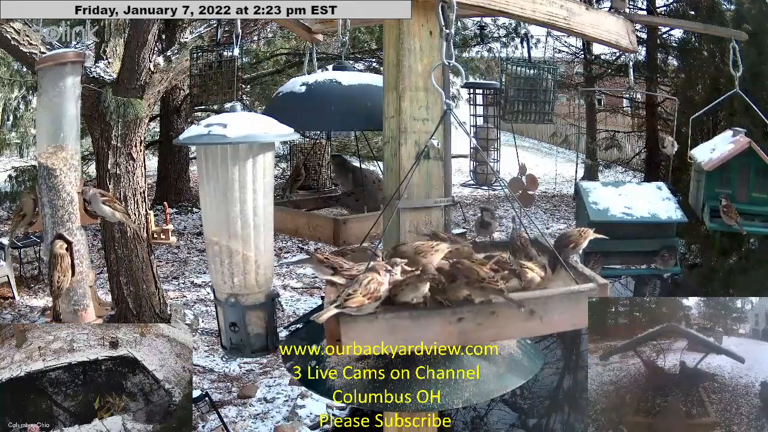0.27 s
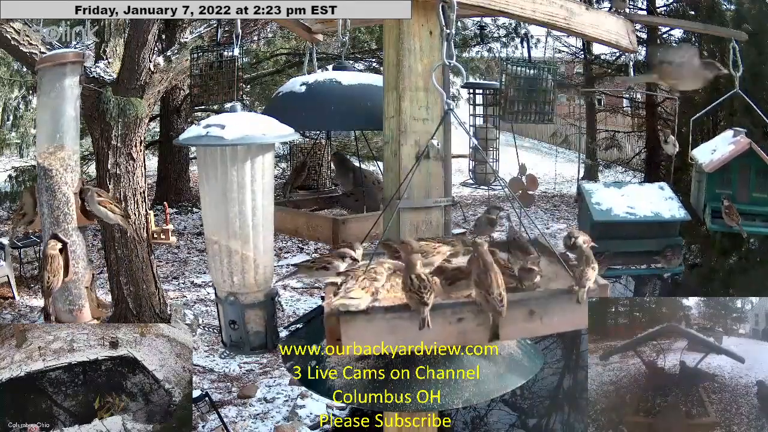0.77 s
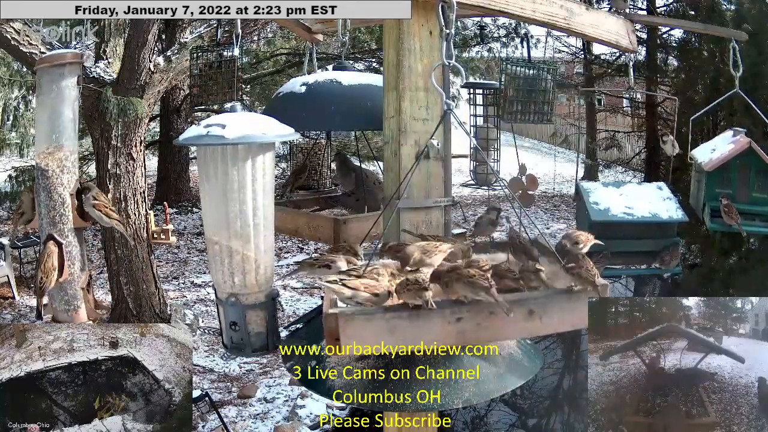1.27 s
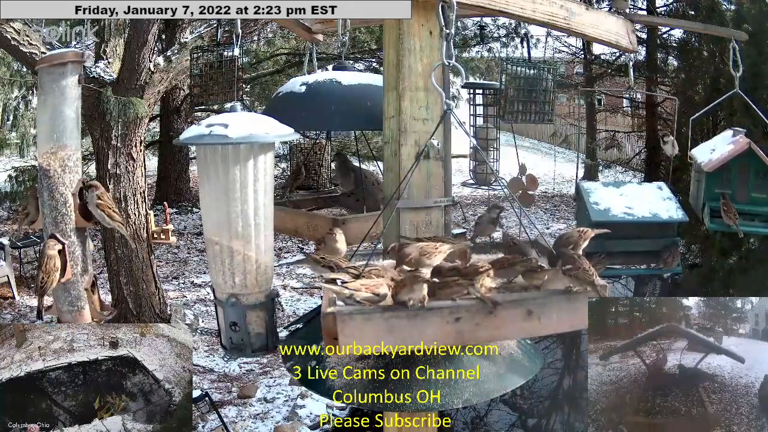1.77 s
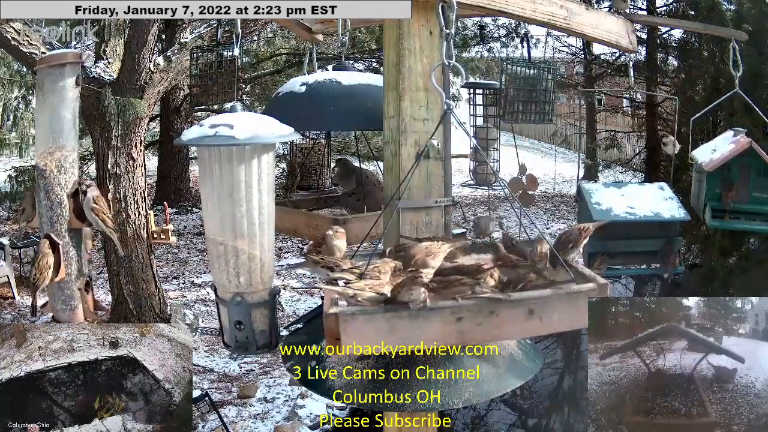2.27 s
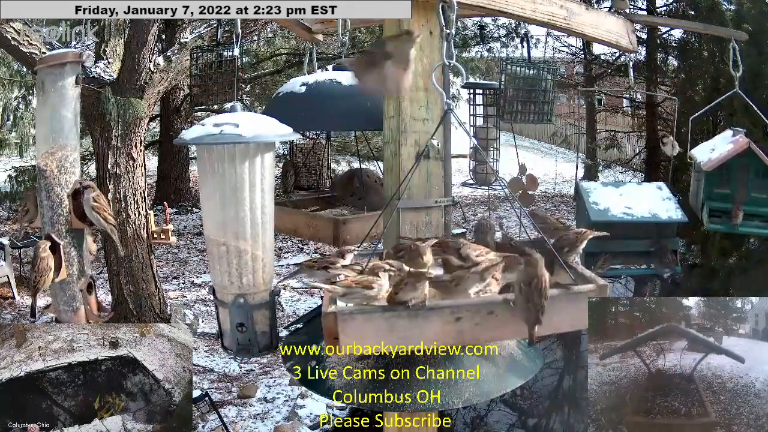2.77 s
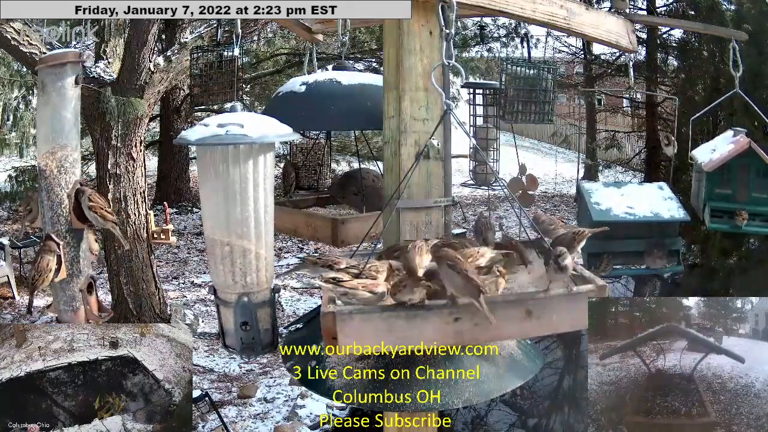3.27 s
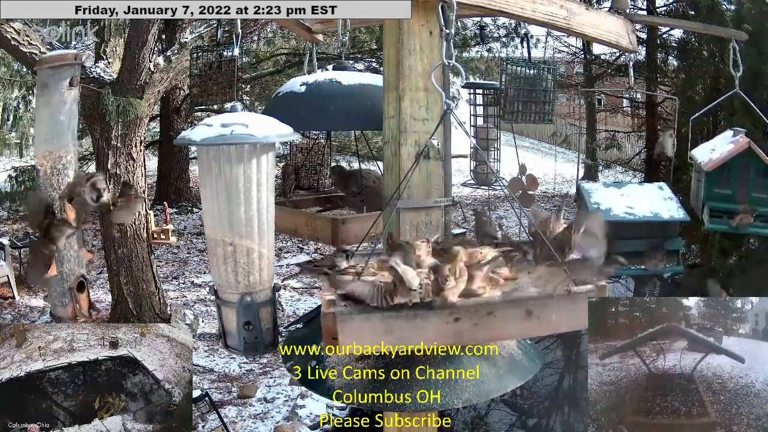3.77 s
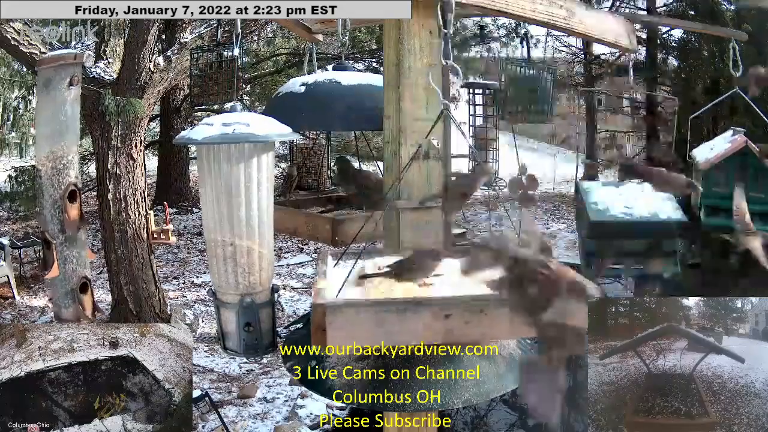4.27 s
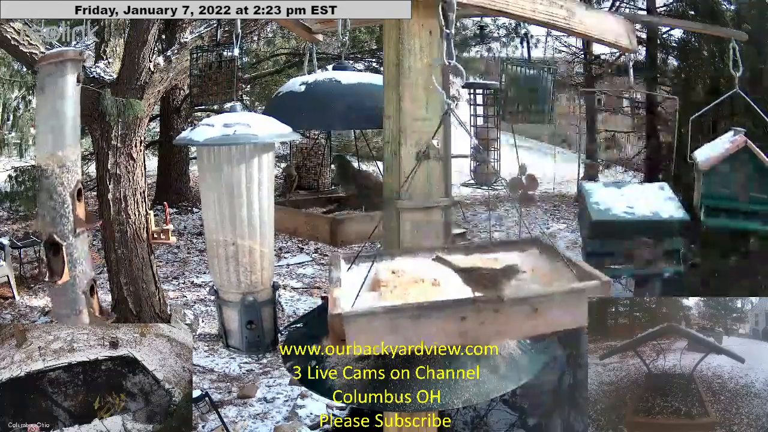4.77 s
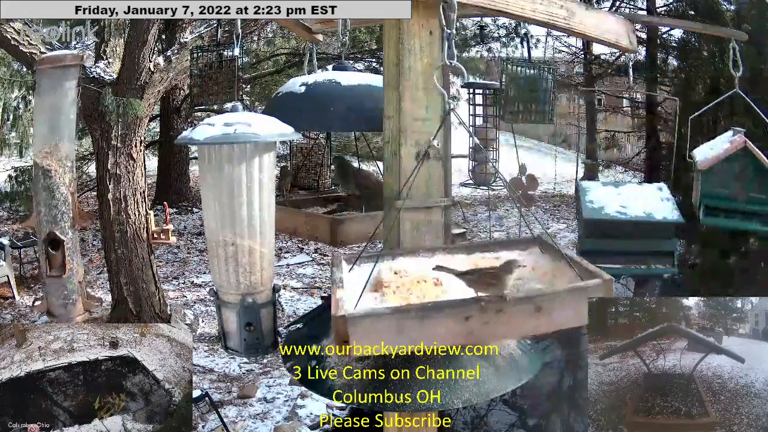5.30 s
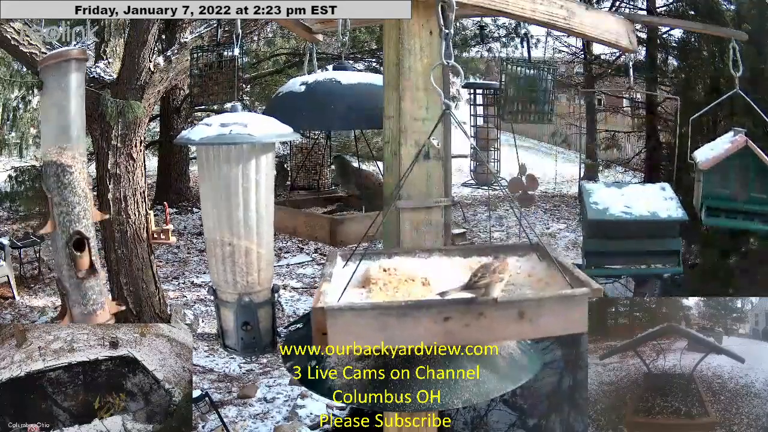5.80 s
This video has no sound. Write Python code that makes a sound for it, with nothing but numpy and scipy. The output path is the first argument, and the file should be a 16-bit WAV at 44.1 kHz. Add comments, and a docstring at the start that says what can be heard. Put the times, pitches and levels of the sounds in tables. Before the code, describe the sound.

Small birds peck and tick at seed on a wooden tray with sparse sharp chirps, then louder knocks and a throbbing rush of wings.

```python
"""Sparrows on a garden seed tray

A winter garden: chirps are gliding sines; seeds, beaks and claws ring decaying modes or scuff in noise grains.
Single birds flutter off, then the flock leaves in two waves of throbbing noise. Puffs, downwash and light
air buffet the microphone with low wavering lumps. A machine hums nearby, over the far murmur of the
neighbourhood in shaped noise; nearby surfaces give the calls, taps and scuffs a short tail."""
import sys
import numpy as np
from scipy import signal
from scipy.fft import rfft, irfft, next_fast_len
from scipy.io import wavfile
from scipy.ndimage import uniform_filter1d

SR = 44100
rng = np.random.default_rng(int(sys.argv[2]) if len(sys.argv) > 2 else 0)


def materialize(psi):
    """Save the field psi as 16-bit PCM at rate SR to the path in sys.argv[1].

    A 1-D psi becomes a single channel; in a 2-D psi each row is a channel.
    """
    bounded = np.clip(np.atleast_2d(psi).T, -1, 1)
    quanta = np.round(bounded * 32767).astype(np.int16)
    wavfile.write(sys.argv[1], SR, quanta)


N = 266364   # samples, about 6 s

# Clear chirps, one table for each side of the syrinx: [t/s, f/Hz, peak level/dB]
CHIRPS = [
    [(0.838, 5660, -49), (0.86, 5360, -44), (0.88, 4990, -43), (0.895, 4420, -49), (0.902, 3560, -49)],
    [(0.984, 6750, -54), (1.0, 6020, -47.5), (1.02, 5710, -37.5), (1.04, 5000, -49), (1.057, 4030, -51)],
    [(0.978, 6100, -56), (0.995, 5610, -42.5), (1.015, 5390, -49), (1.03, 4840, -52), (1.045, 4130, -56)],
    [(4.04, 7300, -49), (4.05, 6500, -48), (4.062, 6420, -44), (4.075, 5970, -37.5), (4.09, 5610, -39),
     (4.094, 5560, -56)],
    [(4.098, 5310, -52), (4.104, 5120, -38), (4.112, 4900, -36), (4.128, 4940, -37.5), (4.137, 4700, -60)],
    [(4.034, 6160, -41.5), (4.06, 5600, -45), (4.085, 5110, -41), (4.105, 4540, -44.5), (4.125, 4170, -39),
     (4.14, 3850, -60)],
    [(5.064, 5790, -57), (5.075, 5650, -29.5), (5.085, 5270, -32), (5.093, 5370, -34), (5.105, 5040, -29.5),
     (5.115, 4750, -29), (5.124, 4220, -31)],
    [(5.055, 4460, -49), (5.066, 4810, -33.5), (5.078, 4680, -26), (5.088, 4220, -33), (5.1, 4180, -29.5),
     (5.113, 4060, -32), (5.126, 3400, -40)],
    [(5.24, 6220, -47), (5.26, 5990, -43), (5.29, 5530, -52), (5.32, 4920, -49)],
    [(5.525, 7160, -54), (5.535, 6480, -37), (5.545, 6620, -36), (5.555, 6120, -40), (5.563, 5910, -51)],
    [(5.52, 6150, -46), (5.54, 5940, -37), (5.55, 5700, -36.5), (5.56, 5390, -38)],
]
# Low calls with overtones: [t/s, f/Hz, level/dB of fundamental, of 2nd harmonic, of 3rd where it sounds]
LOW_CALLS = [
    [(.836, 2600, -60, -57, -70), (.855, 2563, -57.5, -44.5, -53), (.87, 2400, -65, -48, -48),
     (.885, 2100, -66, -53, -51), (.893, 2060, -72.5, -64, -63)],
    [(1.538, 6250, -64, -85), (1.55, 5130, -47.5, -90), (1.562, 4190, -50.5, -95), (1.572, 2876, -50, -66),
     (1.587, 2606, -55, -62), (1.6, 2560, -63.5, -62), (1.625, 2640, -44, -52), (1.65, 2370, -44, -53.5),
     (1.669, 1885, -64, -60)],
    [(5.172, 2209, -43.5, -56), (5.18, 2527, -44, -44), (5.19, 2976, -42, -42), (5.2, 3171, -39.5, -54),
     (5.22, 3050, -40.5, -64), (5.242, 2860, -45, -57)],
]
# Faint short notes and overtones, each one straight glide:
# [start t/s, length t/s, first f/Hz, last f/Hz, peak level/dB]
SHORT_NOTES = [(.915, .017, 2050, 1880, -60), (0.979, 0.016, 1670, 1620, -73),
               (0.838, .033, 8150, 8750, -64), (1.46, 0.018, 4500, 3920, -51.5),
               (3.183, 0.089, 1708, 1750, -68), (3.413, 0.01, 6950, 6690, -53),
               (3.417, 0.024, 5860, 5240, -56), (3.418, 0.056, 2620, 2780, -65),
               (3.85, 0.038, 3370, 3346, -62), (3.848, .05, 2440, 2380, -72),
               (4.482, 0.027, 6250, 6300, -67), (4.736, 0.022, 4700, 4000, -49.5),
               (4.976, 0.025, 5640, 5314, -43), (5.878, 0.096, 5550, 4356, -61.5),
               (5.888, 0.036, 4943, 4740, -60)]
NOTE_EDGE_DB = -11.5   # start and end of a short note, relative to its middle

# Beaks, seeds and claws on the tray: [t/s, snap level/dB, low knock level/dB, bright tick level/dB]
TAPS = [(0.0616, -28, -20.5, -60), (0.2853, -52, -63, -53), (.3429, -42, -61.5, -60),
        (0.402, -30, -30, -90), (.4339, -54, -43, -90), (.4574, -48, -41, -64), (0.6168, -60, -57, -60),
        (0.716, -50, -51, -78), (0.9207, -52, -56, -73), (1.199, -39.5, -43, -82),
        (1.3527, -48.5, -41.5, -50), (1.436, -44, -47, -80), (1.6757, -44, -35, -49),
        (1.6912, -46, -28.5, -40), (1.7004, -57, -52, -37), (1.7837, -41, -30.5, -38),
        (1.8575, -44, -51, -40), (1.891, -57.5, -35, -45), (1.9357, -41, -36, -41),
        (2.2274, -43, -44, -79.5), (2.2449, -25, -26, -78), (2.2528, -52, -37, -80),
        (2.6495, -44, -37, -75), (2.8591, -53, -35.5, -64.5), (3.3892, -60, -34, -53),
        (3.4718, -46, -28, -55), (4.1737, -63, -60, -42), (4.21, -55, -55, -45), (4.4273, -54, -49, -61),
        (4.7268, -31.5, -29.5, -82), (4.8694, -55, -32, -68), (4.9324, -54.5, -31, -64),
        (5.035, -21.5, -12.5, -53.5), (5.2055, -24, -35, -26), (5.2348, -30, -18, -29),
        (5.265, -29, -16.5, -36), (5.296, -47, -24, -36), (5.3311, -36, -21.5, -43),
        (5.4591, -32.5, -17, -79), (5.4947, -27, -14.5, -80), (5.502, -50, -12.5, -57.5),
        (5.567, -49, -9.5, -23), (5.576, -16, -21, -17.5), (5.6471, -33, -21, -45), (5.7214, -48, -23, -52)]
# Resonances of tray and seed shells, low, middle and bright: [f/Hz, relative level/dB, share of the ring time]
KNOCK_MODES = [(1070, -8, 1.06), (1317, -5, 0.63), (1760, 0.5, 0.29)]
SNAP_MODES = [(2365, -0.5, 0.69), (2860, 1.5, 0.26), (3370, 2.5, 0.71), (4270, -3, 1.74)]
TICK_MODES = [(5670, -6, 0.98), (6600, -2.5, 1), (7370, -4.5, 0.74)]
RING_T60_S, MODE_PITCH_SPREAD = 0.0068, 0.046   # time for share 1; spread as a fraction of f
SCATTER_T60_S = 0.065
# Fainter pecking at random while the birds feed; mean levels are (snap, knock, tick)
PECKS_PER_S, PECK_DB, PECK_SPREAD_DB, FEEDING_ENDS_S = 4, (-59, -52, -66), 4, 4.8

# Claws and feathers scuffing tray and seed: [start t/s, length t/s, centre f/Hz, width f/Hz, level/dB]
SCUFFS = [(0.022, .09, 2800, 2420, -59), (0.066, .045, 3000, 3070, -61), (0.449, .077, 2280, 610, -64.5),
          (0.45, .054, 6020, 2520, -65), (0.389, 0.056, 1800, 2500, -67), (0.626, .023, 6800, 1170, -65),
          (1.143, .055, 2380, 600, -66), (1.431, .046, 2500, 2500, -61), (1.679, .043, 1500, 2000, -71),
          (1.769, .041, 1200, 1800, -62), (1.93, .052, 1480, 2200, -56.5), (1.967, .043, 3420, 5100, -66),
          (2.026, .032, 4000, 5000, -76), (2.081, 0.038, 5070, 3900, -62), (2.12, 0.046, 5000, 3500, -64),
          (2.171, 0.026, 5500, 3500, -63), (2.225, .083, 2980, 2510, -72), (2.267, .055, 3930, 1170, -66.5),
          (2.636, .066, 2860, 2480, -65), (2.775, .117, 2120, 1200, -63.5), (2.83, 0.053, 5400, 4000, -69),
          (2.834, .072, 1330, 500, -54.5), (2.914, .074, 1370, 300, -70), (2.94, .064, 5760, 2000, -71),
          (3.189, .15, 1900, 800, -70.5), (3.412, .037, 5850, 2200, -62), (3.414, .046, 2700, 500, -59.5),
          (3.466, .041, 4650, 4000, -58), (3.471, .078, 1020, 454, -56.5),
          (3.481, 0.064, 4000, 5000, -65.5), (3.82, .058, 2860, 2490, -64), (3.855, .049, 3450, 1200, -68),
          (3.9, .104, 4000, 3500, -68.5), (3.968, .054, 3800, 1200, -68), (4.721, .087, 3720, 2500, -59.5),
          (4.97, .035, 5620, 700, -47), (5.151, .05, 5800, 900, -46.5)]

# Fence, trunks and house wall: decay time and level of their tail
GARDEN_T60_S, GARDEN_DB = .13, -18.5

# Flock taking off in two waves: [t/s, feather rustle level/dB]; the low sweep follows it
FLOCK = [(4.7, -72.5), (4.85, -64), (5.0, -51.5), (5.12, -48.5), (5.26, -41), (5.4, -47.5), (5.47, -47),
         (5.55, -41.5), (5.62, -43.5), (5.75, -49.5), (5.9, -64), (6.04, -73)]
FLOCK_SWEEP_DB = 2   # low sweep relative to the rustle
# Single birds fly or flutter: [start t/s, length t/s, feather rustle level/dB, low wing sweep level/dB]
FLIGHTS = [(0.086, 0.015, -70, -78), (0.435, 0.07, -73, -65), (0.897, 0.06, -68, -77),
           (1.694, 0.31, -58.5, -60.5), (3.431, 0.024, -66.5, -76), (3.541, 0.025, -96, -67),
           (4.012, 0.11, -57.5, -65), (4.155, 0.12, -61, -62), (4.687, 0.071, -69, -66.5)]
FLIGHT_RISE_DB_PER_S, FLIGHT_FALL_DB_PER_S = 133, 103
# Feeding birds shift about all the time: rustle, low sweep, and the swing of both
SHUFFLE_DB, SHUFFLE_SWEEP_DB, SHUFFLE_SWING_DB = -76.5, -70, 3.5
# Colour of air through feathers: [f/Hz, relative level/dB per Hz]
RUSTLE = [(300, -25.5), (700, -8), (1600, -4), (3200, -5), (5600, -4), (7400, -9), (7900, -23),
          (8500, -27.5), (9100, -42.5)]
# Colour of the low sweep of the wings: [f/Hz, relative level/dB per Hz]
SWEEP = [(90, -17.5), (160, -1.5), (300, -6), (450, -9), (700, -13.5), (1200, -21)]
# Wingbeats of several birds, never quite in step: [central f/Hz]
WINGBEATS_HZ = [23.2, 24.5, 26.95]

# Downwash on the microphone, one bird landing close by, then the flock: [t/s, level/dB, f/Hz of the lumps]
DOWNWASH = [
    [(.1, -62, 34), (.18, -44.5, 35.4), (.3, -33, 45.65), (.37, -36, 60.03), (.43, -56.5, 35.7)],
    [(4.75, -53.5, 45.07), (5.0, -44, 42.2), (5.13, -33.5, 65.4), (5.2, -31, 68.3), (5.26, -20.5, 51.07),
     (5.37, -28, 40.67), (5.42, -34.5, 46.45), (5.47, -31, 48.2), (5.6, -33.5, 53.23), (5.72, -37, 50.16),
     (5.85, -40.5, 43.2), (6.04, -44.5, 40.4)],
]
# Lone puffs from a wing close by: [t/s, level/dB, f/Hz of the lumps]
PUFFS = [(.05, -41, 31.3), (0.137, -38, 36.8), (0.218, -38, 41.2), (0.488, -40, 47.74),
         (1.505, -32.5, 43.2), (1.68, -46, 41.9), (2.222, -42, 27.05), (2.732, -46.5, 52.6),
         (3.87, -50, 27), (4.1, -52, 69.2)]
PUFF_FADE_DB_PER_S = 450   # both rise and fall
# Light air stirring at the microphone: [t/s, mean level/dB, central f/Hz of the lumps]
BREEZE = [(0, -56, 35.7), (.45, -50, 25.3), (.65, -60, 39.9), (1.1, -56, 32.1), (1.33, -46.5, 23.24),
          (1.45, -51.5, 37.9), (1.8, -48.5, 45.2), (2.05, -55, 44.82), (2.45, -50.5, 48.04),
          (2.9, -57, 39.95), (3.35, -53.5, 46.06), (3.75, -56, 50), (3.97, -51, 29.88), (4.33, -47.5, 22.9),
          (4.63, -60, 40), (6.04, -52, 45)]
BREEZE_WANDER, BREEZE_SWING_DB = 0.101, 2.0   # spread of log pitch; spread of level
# Colour of the broader rumble: [f/Hz, relative level/dB per Hz]
BUFFET_TONE = [(12, -23), (25, 2.5), (50, -10.5), (90, -6), (150, -18.5), (250, -35)]

# Partials of the machine hum: [f/Hz, mean rms level/dB]
HUM = [(119.85, -55.5), (180.2, -70.5), (245.2, -74.5), (58.2, -65)]
# Colour of the far neighbourhood: [f/Hz, relative level/dB per Hz]
MURMUR = [(60, 1), (150, -13), (300, -21), (700, -16.5), (1300, -26.5), (3000, -33), (6000, -39.5),
          (7600, -51.5), (8000, -53.5), (9100, -69.5)]
MURMUR_DB = -67   # rms
STOPBAND_HZ = 9250   # 60 dB down from here up


def calls():
    """Vibrating membranes whistle clear chirps and short notes; more wobble makes the low calls husky."""
    short_notes = []
    for s, length, hz, end_hz, db in SHORT_NOTES:
        start = (s, hz, db + NOTE_EDGE_DB)
        middle = (s + length / 2, (hz + end_hz) / 2, db)
        end = (s + length, end_hz, db + NOTE_EDGE_DB)
        short_notes.append([start, middle, end])
    clear = sum(whistle(rows, wobble=.005, rasp_db=1.8) for rows in CHIRPS + short_notes)
    husky = sum(whistle(rows, wobble=.02, rasp_db=3.0) for rows in LOW_CALLS)
    return clear + husky


def whistle(rows, wobble, rasp_db):
    """One membrane: gliding partials with a slight wobble in pitch and level."""
    s, hz, *levels = np.transpose(rows)
    t = np.arange(int(s[0] * SR), min(int(s[-1] * SR), N)) / SR
    # a moving average leaves slow chance, scaled back to spread 1
    shake = uniform_filter1d(rng.standard_normal((2, len(t))), size=60, axis=1) * np.sqrt(60)
    pitch = np.interp(t, s, hz) * (1 + wobble * shake[0])
    phase = 2 * np.pi * np.cumsum(pitch) / SR
    tone = sum(amp(np.interp(t, s, db)) * np.sin((k + 1) * phase) for k, db in enumerate(levels))
    edge = np.clip(np.minimum(t - s[0], s[-1] - t) / 0.00044, 0, 1)   # 0.44 ms ramps
    out = np.zeros(N)
    out[int(s[0] * SR):][:len(t)] = tone * edge * amp(rasp_db * shake[1])
    return out


def taps():
    """Each contact is a short blunt push and a scatter of smaller ones, ringing tray and shells briefly."""
    out = np.zeros(N)
    t = np.arange(int(.12 * SR)) / SR
    for s, snap_db, knock_db, tick_db in TAPS + pecks():
        ring = np.zeros(len(t))
        for modes, group_db in ((KNOCK_MODES, knock_db), (SNAP_MODES, snap_db), (TICK_MODES, tick_db)):
            for k, (hz, db, share) in enumerate(modes):
                luck = rng.standard_normal(2)   # dB in level, then pitch
                fade_db = -60 * t / (RING_T60_S * share)
                level = amp(group_db + db + luck[0] + fade_db)
                mode_hz = hz * (1 + MODE_PITCH_SPREAD * luck[1])
                ring += (-1) ** k * level * np.sin(2 * np.pi * mode_hz * t)
        ring *= 1 - np.exp(-t / 0.0003)   # the contact takes a moment to build
        sparse = rng.standard_normal(len(t)) * (rng.random(len(t)) < .05)
        contacts = sparse * amp(-18 - 60 * t / SCATTER_T60_S)
        contacts[0] = 1   # the main push
        at = int(s * SR)
        hit = signal.fftconvolve(ring, contacts)[:N - at]
        out[at:at + len(hit)] += hit
    return out


def pecks():
    """Faint contacts at random moments while the birds feed."""
    rows = []
    for _ in range(int(PECKS_PER_S * FEEDING_ENDS_S)):
        s = rng.uniform(0, FEEDING_ENDS_S)
        levels_db = PECK_DB + PECK_SPREAD_DB * rng.standard_normal(len(PECK_DB))
        rows.append((s, *levels_db))
    return rows


def scuffs():
    """Rubbing: dense uneven grains in one broad resonance, swelling fast and dying away."""
    out = np.zeros(N)
    for s, length, hz, width, db in SCUFFS:
        u = np.linspace(0, 1, int(length * SR))
        # seeds and barbs let go one by one
        catches = (rng.random(len(u)) < .012) * rng.exponential(1, len(u))
        grains = rng.standard_normal(len(u)) * (.35 + 3.5 * catches)
        edges = np.clip([hz - width / 2, hz + width / 2], 100, 9000)
        rub = signal.sosfilt(signal.butter(2, edges, "band", fs=SR, output="sos"), grains)
        envelope = np.sin(np.pi * u ** 0.46) ** 2
        out[int(s * SR):][:len(u)] += amp(db) * rms_one(rub) * envelope
    return out


def wings():
    """Air through feathers throbs with the wingbeats; a crowd of wings blurs the beat."""
    flock = amp(in_time([(0, -120), *FLOCK])[0]) ** 2
    slopes = FLIGHT_RISE_DB_PER_S, FLIGHT_FALL_DB_PER_S
    # powers of the two layers: flock, shuffling, single flights
    rustling = flock + amp(SHUFFLE_DB + SHUFFLE_SWING_DB * drift(1.3)) ** 2
    rustling += sum(swell(s, length, db, *slopes) for s, length, db, _ in FLIGHTS)
    sweeping = flock * amp(FLOCK_SWEEP_DB) ** 2
    sweeping += amp(SHUFFLE_SWEEP_DB + SHUFFLE_SWING_DB * drift(4.7)) ** 2
    sweeping += sum(swell(s, length, db, *slopes) for s, length, _, db in FLIGHTS)

    beat = np.zeros(N)
    for hz in WINGBEATS_HZ:
        wandering_hz = hz * (1 + 0.117 * drift(3.836))
        beat += np.sin(2 * np.pi * np.cumsum(wandering_hz) / SR)
    depth_db = np.interp(10 * np.log10(rustling), [-58, -46], [1.35, 1.15])   # shallower when loud
    throb = amp(depth_db * beat)

    rustle = patchy(RUSTLE, patchy_db=1.2, rate=40, grains_per_s=300 * throb, grain_db=11)
    sweep = coloured(rng.standard_normal(N), SWEEP)
    return throb * (np.sqrt(rustling) * rustle + np.sqrt(sweeping) * sweep)


def buffet():
    """Air on the microphone: lumps of pressure over a rumble; the strongest air sets their pitch."""
    db, hz = in_time(BREEZE)
    breeze_power = amp(db + BREEZE_SWING_DB * drift(5.1)) ** 2
    airs = [(breeze_power, hz * np.exp(BREEZE_WANDER * drift(2.98)))]
    for s, db, hz in PUFFS:
        airs.append((swell(s, 0, db, PUFF_FADE_DB_PER_S, PUFF_FADE_DB_PER_S), hz))
    t = np.arange(N) / SR
    for rows in DOWNWASH:
        db, hz = in_time(rows)
        blowing = (t >= rows[0][0]) * (t <= rows[-1][0])
        airs.append((amp(db) ** 2 * blowing, hz))

    power = sum(p for p, _ in airs)
    lump_hz = sum(p * hz for p, hz in airs) / power   # mean weighted by power
    phase = 2 * np.pi * np.cumsum(lump_hz) / SR + 1.26 * drift(10.6)
    lumps = np.sqrt(2) * np.sin(phase) * amp(2.25 * drift(25))
    rumble = coloured(rng.standard_normal(N), BUFFET_TONE)
    return np.sqrt(power) * rms_one(lumps + amp(-3.0) * rumble)


def machine_hum():
    """A machine nearby: steady low partials, each wavering a little in level and phase."""
    t = np.arange(N) / SR
    hum = np.zeros(N)
    for hz, db in HUM:
        level = np.sqrt(2) * amp(db + 0.9 * drift(6))
        hum += level * np.sin(2 * np.pi * hz * t + .4 * drift(4))
    return hum


def far_murmur():
    """The far neighbourhood as steady noise, strongest in the bass."""
    return amp(MURMUR_DB) * coloured(rng.standard_normal(N), MURMUR)


def garden(x):
    """Reflections from nearby surfaces: a short, faint, diffuse tail that starts after 6 ms."""
    t = np.arange(int(.25 * SR)) / SR
    tail = rng.standard_normal(len(t)) * amp(-60 * t / GARDEN_T60_S) * (t > .006)
    return x + amp(GARDEN_DB) * signal.fftconvolve(x, tail / np.linalg.norm(tail))[:N]


def amp(db):
    """Decibels to gain."""
    return 10 ** (np.asarray(db) / 20)


def rms_one(x):
    """Scale to unit rms."""
    return x / np.sqrt(np.mean(x ** 2) + 1e-20)


def in_time(rows):
    """Columns of a curve, sample by sample."""
    s, *columns = np.transpose(rows)
    return [np.interp(np.arange(N) / SR, s, c) for c in columns]


def swell(start, length, db, rise_db_per_s, fall_db_per_s):
    """Power of a sound that climbs to its level, holds it and falls away."""
    t = np.arange(N) / SR
    rise = rise_db_per_s * np.maximum(start - t, 0)
    fall = fall_db_per_s * np.maximum(t - start - length, 0)
    return amp(db - rise - fall) ** 2


def drift(rate):
    """Slow chance with spread 1: noise through two equal poles at rate Hz."""
    r = np.exp(-80 * np.pi * rate / SR)   # one step is 40 samples
    noise = rng.standard_normal(N // 40 + 2002)
    slow = signal.lfilter([1], [1, -2 * r, r * r], noise)[2000:]   # drop the settling
    return np.interp(np.arange(N) / 40, np.arange(len(slow)), rms_one(slow))


def coloured(x, spectrum):
    """Give a signal the colour of a spectrum; rms 1."""
    size = next_fast_len(N)
    hz, db = np.transpose(spectrum)
    grid = np.maximum(np.arange(size // 2 + 1) * SR / size, 1)
    level = np.interp(np.log(grid), np.log(hz), db, left=-80, right=-80)
    return rms_one(irfft(rfft(x, size) * amp(level), size)[:N])


def patchy(spectrum, patchy_db, rate, grains_per_s, grain_db):
    """Coloured noise with fine grains; each half-octave band flickers and crackles on its own."""
    out = np.zeros(N)
    for low in 280 * 2.0 ** np.arange(0, 5, .5):
        sizes = amp(3.3 * np.minimum(rng.exponential(1, N), 4))
        grains = (rng.random(N) < grains_per_s / SR) * sizes
        x = rng.standard_normal(N) * (1 + amp(grain_db) * grains)
        band = signal.sosfilt(signal.butter(2, [low, np.sqrt(2) * low], "band", fs=SR, output="sos"), x)
        out += band * amp(patchy_db * drift(rate))
    return coloured(out, spectrum)


def scene():
    """Birds on the tray in the garden, wings and air at the microphone, hum and murmur behind."""
    tray = garden(calls() + taps() + scuffs())
    mix = tray + wings() + buffet() + machine_hum() + far_murmur()
    return mix[None, :]


def record(dry):
    """A steep low-pass cuts the top."""
    return signal.sosfilt(signal.cheby2(20, 60, STOPBAND_HZ, fs=SR, output="sos"), dry)


dry = scene()
out = record(dry)
materialize(out)
```